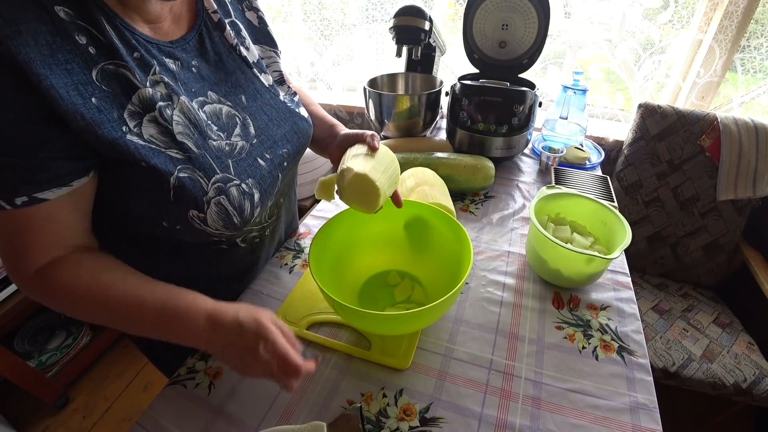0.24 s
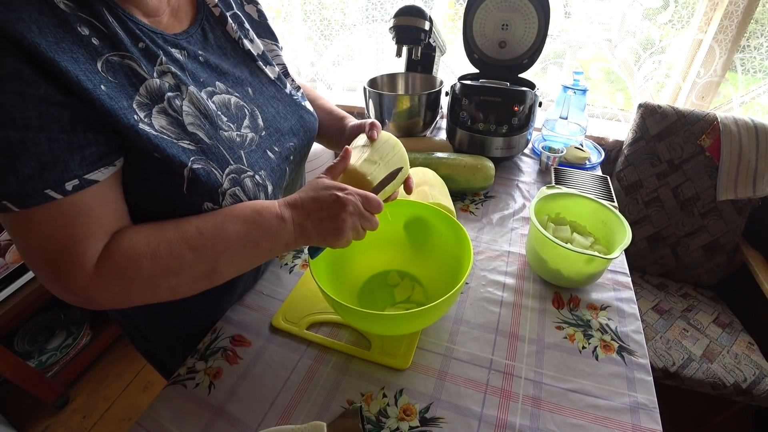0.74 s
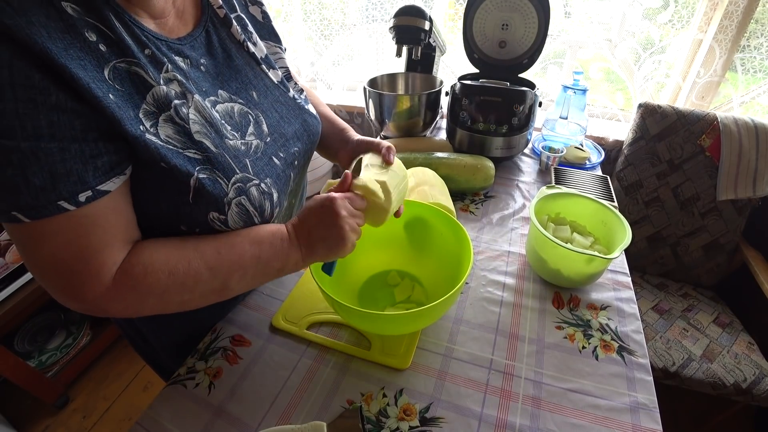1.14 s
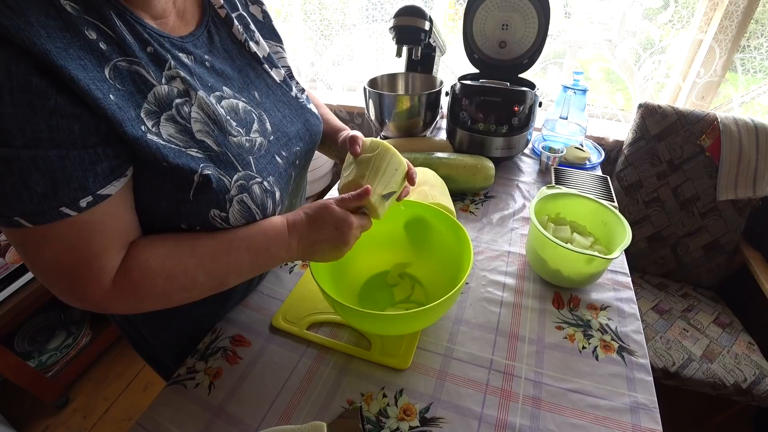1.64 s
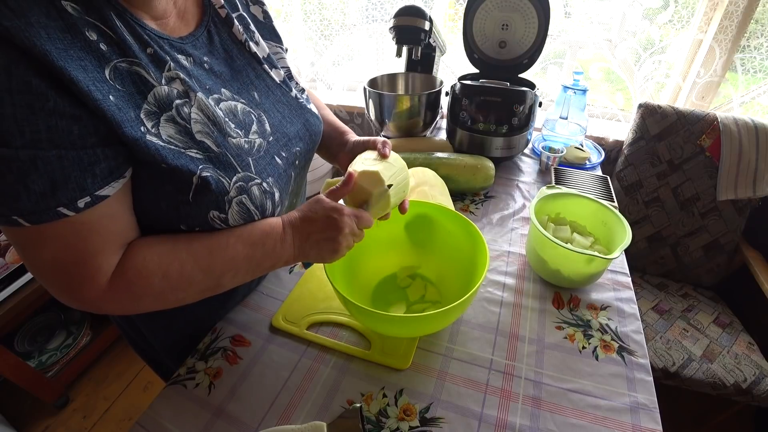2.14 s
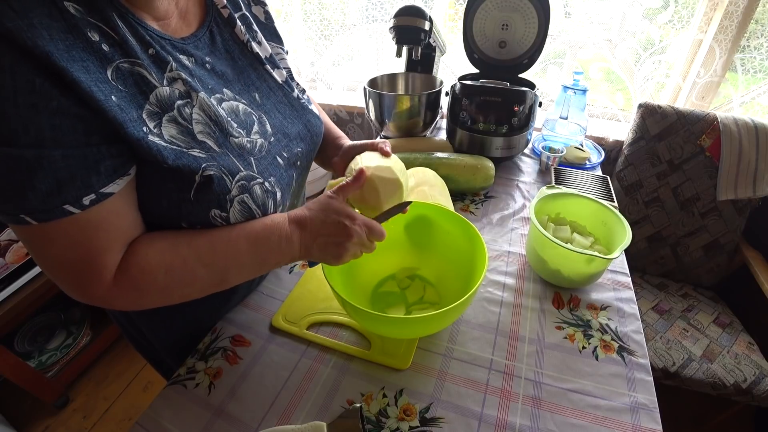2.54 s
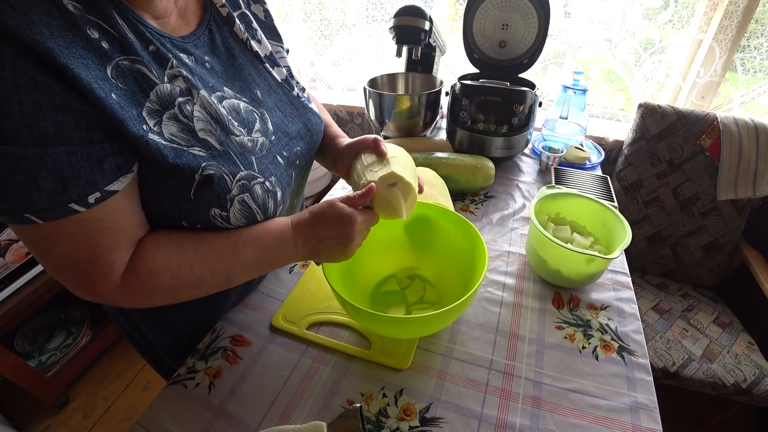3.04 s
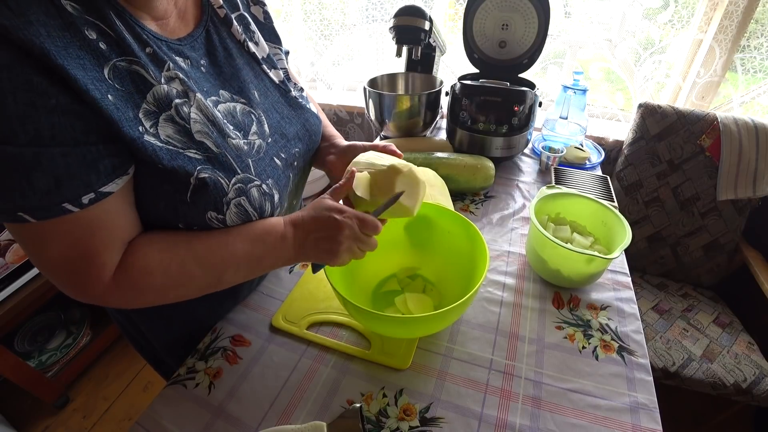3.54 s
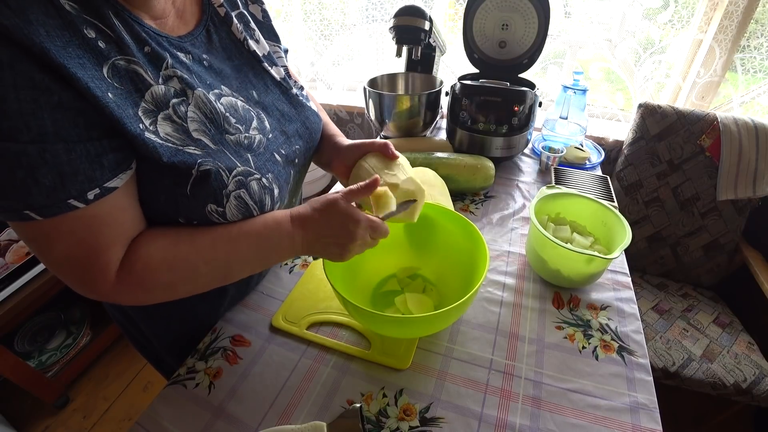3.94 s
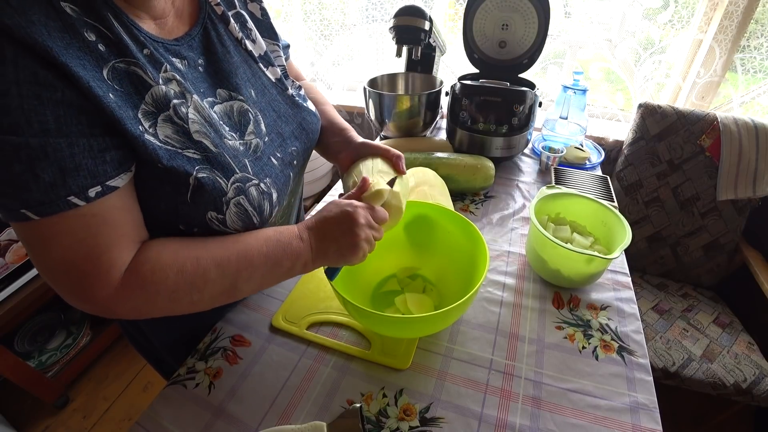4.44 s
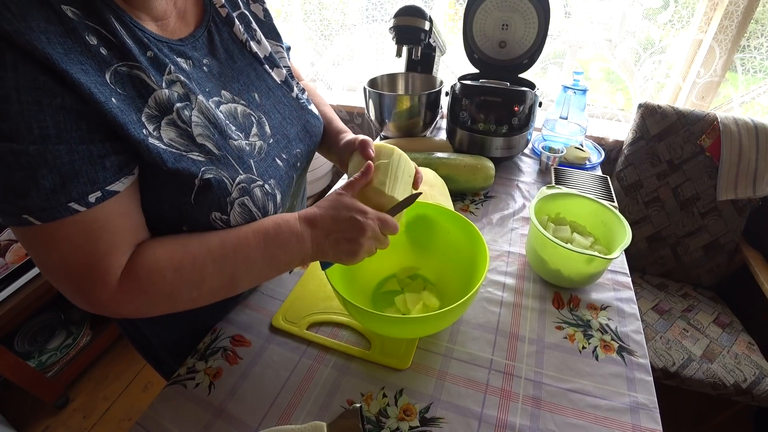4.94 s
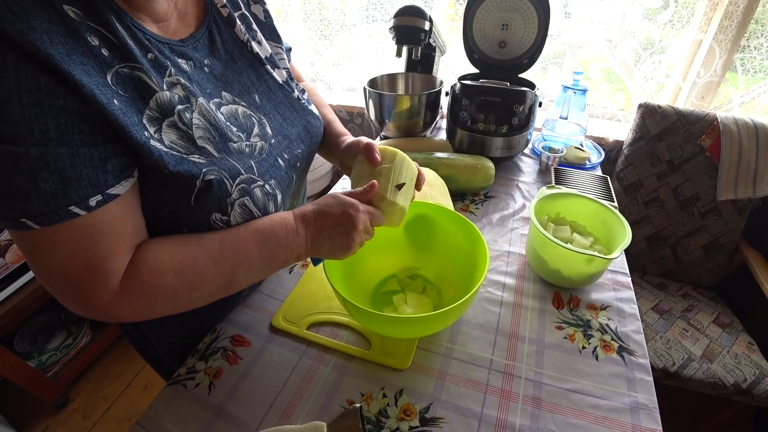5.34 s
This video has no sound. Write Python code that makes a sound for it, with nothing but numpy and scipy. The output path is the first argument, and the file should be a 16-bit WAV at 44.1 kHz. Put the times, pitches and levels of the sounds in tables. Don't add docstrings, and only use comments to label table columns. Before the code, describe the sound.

A knife crisply cuts a firm wet vegetable in the hand, chunks knocking and bouncing into a plastic bowl in a small humming kitchen.

```python
import sys
import numpy as np
from scipy import signal
from scipy.fft import rfft, irfft
from scipy.io import wavfile
from scipy.ndimage import uniform_filter1d

SR = 44100
rng = np.random.default_rng(int(sys.argv[2]) if len(sys.argv) > 2 else 0)


def ratio(d):
    e = np.asarray(d, float) / 20
    return 10 ** e


def transcribe(u):
    v = np.clip(np.atleast_2d(u).T, -1, 1)
    q = np.round(v * 32767).astype(np.int16)
    wavfile.write(sys.argv[1], SR, q)


N = 247309
TIME = np.arange(N) / SR
BOOM_HZ = 760

# (frequency [Hz], level [dB])
AIR_SPECTRUM = [(20, -16), (40, 6), (70, -19), (110, -12.5), (200, -9.5), (450, -9.5), (650, -13),
                (900, -18.5), (1600, -22), (3100, -24), (3750, -24), (4500, -25), (9000, -27), (11000, -29)]
# (frequency [Hz], level [dB])
AIR_SIDE = [(60, -18), (110, -5), (350, -6), (620, -1.5), (1120, 4.5), (2000, 3.5), (3600, -1), (6500, -5),
            (11000, -2)]
# (frequency [Hz], level [dB rms], wobble [dB])
FRIDGE_LINES = [(49, -50.5, 1), (97.6, -67, 1), (146.2, -62.5, -1), (190.9, -65.5, 4), (248, -68.5, 6.5),
                (294.5, -57.5, 1.5), (336, -74, 1.5)]
# (time [s], level [dB])
CLOTH_DRAG = [
    (0.0, -42.5),
    (0.032, -57),
    (0.116, -50.5),
    (0.162, -47),
    (0.216, -58.5),
    (0.396, -55.5),
    (0.41, -78),
    (0.572, -66),
    (0.6, -85),
]
# (middle [s], length [s], level [dB])
RUBS = [(.5, 0.21, -55.5), (.94, 0.063, -53), (1.07, 0.049, -53), (1.72, 0.23, -51.5), (2.19, .04, -46),
        (2.88, 0.098, -42), (3.07, .04, -59), (3.8, 0.45, -58), (4.2, 0.18, -62), (4.49, 0.18, -51.5),
        (4.75, 0.2, -61), (1.35, 0.22, -64), (3.3, 0.33, -64.5), (5.35, .3, -58.5), (5.13, 0.16, -53.5),
        (5.61, 0.082, -43)]
# (time [s], level [dB])
THUDS = [(0.01, -45), (.8, -53), (1.01, -56), (1.16, -53), (1.6, -52), (1.8, -37.5), (1.89, -37),
         (2.03, -35), (2.14, -45), (2.31, -36), (2.43, -40), (2.53, -43), (2.88, -40.5), (2.97, -44.5),
         (3.15, -44), (3.4, -47), (3.52, -47), (3.72, -50), (4.279, -47), (4.67, -52.5), (5.06, -47),
         (5.25, -53), (5.55, -49)]
# (time [s], peak [dB], frequency [Hz], length [s])
TICKS = [
    (0.066, -46.5, 7600, 0.00093),
    (0.093, -55, 7800, .002),
    (0.102, -54.5, 8400, 0.0066),
    (0.1384, -33.5, 9160, 0.0009),
    (0.167, -48.5, 8900, 0.0061),
]
# (time [s], peak [dB], brightest [Hz], squeak [dB])
SLIPS = [(0.851, -43, 3810, 0.5), (0.902, -40.5, 7540, -5), (0.9314, -47, 7940, 0),
         (0.955, -37.5, 7700, -8), (0.9864, -30.5, 6000, -16), (1.0181, -27.5, 6700, -24),
         (1.055, -26.5, 3880, -25), (1.091, -26.5, 7440, -19), (1.666, -32, 3690, -7.5),
         (1.6927, -26, 8350, -19), (1.767, -28, 9200, 6), (1.823, -45, 5000, -6), (2.157, -25, 6240, -8),
         (2.1867, -29, 8000, 7.5), (2.615, -43, 5500, -6), (3.7675, -42, 7900, -13),
         (3.809, -42.5, 3700, -4.5), (1.722, -41, 5450, -8), (.884, -47, 7370, 1), (4.3802, -30, 8150, -8),
         (4.436, -28, 3500, -9.5), (4.4663, -30.5, 4000, -5), (4.511, -29, 3500, -6.5),
         (4.5724, -39, 3600, -6), (4.645, -30, 5380, -22), (5.011, -40, 4130, 12.5),
         (5.057, -47, 3580, 12.5), (5.118, -39, 3780, -6), (5.203, -37, 4630, -6), (5.307, -30, 8300, -15)]
# (start [s], length [s], fine hiss at bite [dB], at end [dB], coarse tear [dB])
STROKES = [(1.095, 0.053, -41, -40, -5), (1.153, 0.051, -55, -59, -8), (1.558, 0.099, -48.5, -51, -5),
           (1.716, 0.066, -37.5, -46.5, -6), (2.215, 0.036, -28, -42.5, -11), (2.257, 0.074, -54, -58, -7),
           (2.7, 0.12, -55, -60, -10), (2.757, 0.0567, -46.5, -42.5, -7), (2.815, 0.13, -42.5, -44, -8),
           (2.933, 0.099, -46.5, -53.5, -7), (3.072, 0.043, -52, -43.5, -7), (3.112, 0.036, -51, -45.5, 5),
           (4.277, 0.077, -59, -55, -6), (4.322, 0.014, -53, -52, -7.5), (1.772, 0.056, -48, -52, 4),
           (4.558, 0.036, -50.5, -50, -6), (4.6, 0.051, -42, -47.5, -2.5), (5.071, 0.088, -48, -67, -2),
           (5.32, 0.11, -39, -56.5, -7), (5.443, 0.023, -48, -50, -10), (5.497, 0.087, -49.5, -44.5, -4)]
# (frequency [Hz], level [dB per Hz])
FLESH_SPECTRUM = [(1180, -12), (2000, -11.5), (2930, -7.5), (3840, 0), (4410, -2.5), (5780, 1.5),
                  (9930, -2), (11200, -5.5), (11500, -69), (15000, -58), (22000, -120)]
# (frequency [Hz], level [dB per Hz])
SLAP_SPECTRUM = [(2500, 3.5), (3500, 3), (5000, -0.5), (7000, -4), (9000, -13.5), (11500, -18.5)]
# (frequency [Hz], level [dB], t60 [s])
BOWL_MODES = [(425, 1, 0.11), (481.8, -3.5, 0.15), (515, -3.5, 0.13), (549, -1.5, .12), (599.7, -2, 0.14),
              (625, -3.5, 0.084), (715, -1, 0.083), (856, 1.5, 0.17), (972, -3.5, 0.13), (1111, 1.5, 0.089),
              (1145, -9, 0.14), (1272, 2.5, 0.054), (1543, -2, 0.054), (1697, -3.5, 0.085),
              (1872, -5, 0.07), (1905, -1.5, 0.067), (2020, -7, 0.051), (2076, 2.5, 0.046), (2322, 3, 0.03),
              (2425, 4, 0.02), (2590, 0, 0.027), (3000, -2, 0.033), (3300, -27, .03), (3520, -12, 0.021),
              (3700, -4, 0.034), (4440, 2, .025), (4820, 4, 0.029), (4880, -5, .025), (5350, 0, .012)]
# (frequency [Hz], level [dB], t60 [s])
BOARD_MODES = [(164, -1.5, 0.093), (200, 3, 0.14), (257.5, 0, 0.24), (299.5, 3.5, 0.083),
               (346.6, 2.5, 0.089)]
# (time [s], peak [dB], strongest ring [Hz], wall boom [dB], slap [dB])
LANDINGS = [(1.459, -11.5, 1110, -20, -2.5), (1.7377, -11, 2180, -25, -19), (2.061, -6, 1270, -22, -25),
            (2.1829, -15, 1420, -21, -17), (2.3995, -17, 2570, -26, 0.5), (2.5769, -17, 1480, -21, -34),
            (3.1175, -10, 2330, -28, -12.5), (3.3796, -17.5, 1065, -15, -14), (4.05, -39.5, 1020, -4, -31),
            (4.973, -41, 1090, -2, -7), (5.013, -22.5, 1320, -8, -24)]
# (time [s], peak [dB], strongest ring [Hz], wall boom [dB], slap [dB])
BOUNCES = [(1.578, -32.5, 1200, -15, -22), (1.635, -39.5, 711, 1.5, -3), (1.8195, -23, 1830, -18, -4),
           (1.829, -24.5, 1160, -25, -2), (1.8528, -24.5, 1110, -13, -8), (1.887, -18, 1870, -14, -15.5),
           (1.9001, -18.5, 1920, -9.5, -9.5), (1.951, -24.5, 1420, -7, -20), (2.092, -25, 1240, -8, -6),
           (2.2074, -17.5, 1870, -12, -14.5), (2.4202, -21, 1940, -4, -6.5), (2.4313, -16.5, 1150, -18, -8),
           (2.4357, -14.5, 1260, -14, -22), (2.4412, -17.5, 1200, -24, -32),
           (2.4638, -15, 1520, -14, -15.5), (2.4126, -22, 2100, -15, -12), (2.4702, -28, 1290, -6, -21),
           (2.633, -25, 1160, -8, -15.5), (3.1325, -27, 2370, -16, -43), (3.1375, -28, 1950, -8, -40),
           (3.1255, -28, 2240, -13, -42), (3.39, -21, 2380, -23, -7), (3.408, -43, 1120, 15.5, -24),
           (3.494, -36, 950, -18, -25), (4.994, -44, 2330, -17, -6), (5.074, -37, 1110, 5.5, -18)]
# (time [s], peak [dB], strongest ring [Hz], wall boom [dB], fall from that ring [dB per octave])
DRY_KNOCKS = [
    (1.4605, -14, 2130, -39, 60),
    (1.4594, -2.5, 5220, -44, 58),
    (4.974, -38.5, 2100, -32, 40),
    (.067, -43, 890, 3, 21),
    (0.162, -35, 850, -15, 24),
    (0.14, -43, 900, -17, 24),
    (1.4795, -33, 420, 4.5, 12),
]
# (time [s], peak [dB], strongest swing [Hz])
SWINGS = [(1.459, -26, 640), (1.4592, -23, 425), (1.739, -23.5, 540), (2.062, -21.5, 438),
          (2.207, -25, 515), (2.4, -30.5, 434), (2.435, -28, 484), (2.577, -27, 487), (3.118, -28.5, 545),
          (3.392, -26.5, 542), (5.014, -30.5, 518)]
# (time [s], peak [dB])
ROCKS = [(0.082, -40), (0.108, -41), (0.161, -52), (1.458, -31), (1.601, -36), (1.693, -51), (1.738, -26),
         (1.819, -29), (1.886, -26.5), (1.948, -28), (2.062, -20.5), (2.204, -31), (2.404, -26),
         (2.436, -32.5), (2.461, -52), (2.575, -33.5), (3.12, -32), (3.199, -41), (3.3758, -21.5),
         (3.409, -33), (5.014, -29)]
# (frequency [Hz], t60 [s])
ROOM_T60 = [(125, 0.51), (500, 0.42), (1500, 0.35), (4000, 0.24), (10000, 0.08)]
# (frequency [Hz], level [dB])
ROOM_SIDE = [(60, 5), (200, -10.5), (350, -17.5), (1000, -8), (4000, -7.5), (11000, -6)]


def unit(x):
    return x / np.sqrt(np.mean(x ** 2))


def along(points, hz):
    f, v = np.transpose(points)
    return np.interp(np.log(np.maximum(hz, 1)), np.log(f), v)


def colour(x, points):
    gain = ratio(along(points, np.fft.rfftfreq(len(x), 1 / SR)))
    return irfft(rfft(x) * gain, len(x))


def band(x, lo_hz, hi_hz):
    sos = signal.butter(2, [lo_hz, min(hi_hz, .45 * SR)], "bandpass", fs=SR, output="sos")
    return signal.sosfilt(sos, x)


def walk(rate_hz):
    k = int(SR / rate_hz)
    held = np.repeat(rng.standard_normal(N // k + 1), k)
    return 1.3 * uniform_filter1d(uniform_filter1d(held, k), k)[:N]


def crackle(size, spread_db):
    clicks = rng.standard_normal(size)
    burst = np.minimum(rng.exponential(size=size), 5.0)
    return unit(clicks * ratio(spread_db * burst))


def pair(mid, side, side_db):
    return mid + ratio(side_db) * side * np.array([[1], [-1]])


def lean(db):
    return ratio(np.array([[-db], [db]]))


def add(out, s, x):
    i = int(s * SR)
    out[..., i:i + x.shape[-1]] += x[..., :N - i]


def swells(events, rest_db, rise_db_per_s, fade_db_per_s):
    s, length, db = np.transpose(events)[:, :, None]
    early = np.maximum(s - length / 2 - TIME, 0)
    late = np.maximum(TIME - s - length / 2, 0)
    level_db = db - rise_db_per_s * early - fade_db_per_s * late
    return np.maximum(level_db.max(axis=0), rest_db)


def ring(modes, weight_db, luck, t):
    hz, mode_db, t60_s = np.transpose(modes)
    gain = np.sign(luck[0]) * ratio(mode_db + weight_db + 2.0 * np.abs(luck[0]))
    tone = np.sin(2 * np.pi * np.outer(hz * (1 + 0.0028 * luck[1]), t))
    return gain @ (tone * ratio(-60 * t / t60_s[:, None]))


def air():
    total, swell = 0, walk(0.46)
    for hz in 25 * 2 ** np.arange(0, 9, .5):
        mid, side = (colour(band(rng.standard_normal(N), hz / 1.242, hz * 1.25), AIR_SPECTRUM) for _ in range(2))
        total = total + ratio(0.6 * swell + 0.36 * walk(17.0)) * pair(mid, side, along(AIR_SIDE, hz))
    return unit(total) * ratio(-52)


def fridge():
    hum = 0
    for hz, db, wobble_db in FRIDGE_LINES:
        level = np.sqrt(2) * ratio(db + wobble_db * walk(9.))
        hum = hum + level * np.sin(2 * np.pi * np.cumsum(hz * (1 + 0.0024 * walk(2.71))) / SR)
    whine = ratio(-70.5 + 1.0 * walk(4.8)) * unit(band(rng.standard_normal(N), 3600, 3830))
    return whine + hum * lean(.25)


def cloth_drag():
    level_db = np.interp(TIME, *np.transpose(CLOTH_DRAG), right=-90)
    return unit(band(crackle(N, spread_db=3.5), 140, 730)) * ratio(level_db + 3.1 * walk(40.0))


def finger_rubs():
    level_db = swells(RUBS, rest_db=-69, rise_db_per_s=160, fade_db_per_s=160)
    rustle = unit(colour(crackle(N, spread_db=3.0), FLESH_SPECTRUM))
    return rustle * ratio(level_db - 5.5 + 5.1 * walk(25.09))


def table_thuds():
    events = [(s, 0, db) for s, db in THUDS]
    level_db = swells(events, rest_db=-60, rise_db_per_s=160, fade_db_per_s=112)
    return unit(band(band(rng.standard_normal(N), 12.0, 98), 29, 250)) * ratio(level_db - 3.0)


def blade_ticks(out):
    t = TIME[:SR // 12]
    for s, db, hz, length_s in TICKS:
        noise = band(band(rng.standard_normal(len(t)), hz / 1.34, hz * 1.3), hz / 1.3, hz * 1.26)
        u = t / length_s
        tick = 1.13 * unit(noise) + np.sin(2 * np.pi * hz * t)
        add(out, s - length_s, ratio(db) * (u * np.exp(1 - u)) ** 2 * tick)


def blade_slips(out, tear, squeak):
    crest_s, lead_s = 0.0075, .004
    t = TIME[:SR // 12]
    u = t / crest_s
    for s, db, bright_hz, squeak_db in SLIPS:
        i = int(s * SR) % (N - len(t))
        cut = tear[i:i + len(t)]
        bright = unit(band(cut, bright_hz / 1.09, bright_hz * 1.02))
        jerk = 0.96 * cut + 0.33 * bright + ratio(squeak_db - 1.0) * squeak[i:i + len(t)]
        add(out, s - lead_s, ratio(db - 8.5) * (u * np.exp(1 - u)) ** 4 * jerk)


def blade_strokes(tear, squeak):
    firm_db, bite_s = -42, 0.0031
    judder = ratio(1.8 * walk(150.) + 1.5 * walk(35.))
    coarse = unit(band(tear, 2620, 4600))
    fine = unit(band(band(tear, 4650, 12000), 4100, 11300))
    out = np.zeros(N)
    for s, length_s, bite_db, end_db, coarse_db in STROKES:
        db = np.interp(TIME, [s, s + length_s], [bite_db, end_db])
        squeak_db = -9.5 + 0.36 * (firm_db - db)
        edge = np.clip(np.minimum(TIME - s, s + length_s + 0.0043 - TIME) / bite_s, 0, 1)
        out += edge * judder * ratio(db) * (fine + ratio(coarse_db) * coarse + ratio(squeak_db) * squeak)
    return out


def blade():
    tear = unit(colour(crackle(N, spread_db=2.5), FLESH_SPECTRUM))
    squeak = unit(band(band(crackle(N, spread_db=1.5), 650, 2100), 700, 4000))
    out = np.zeros(N)
    blade_ticks(out)
    blade_slips(out, tear, squeak)
    return out + blade_strokes(tear, squeak)


def knocks():
    first = [(*r, max(59.5 + 1.7 * r[-1], 18.5)) for r in LANDINGS]
    again = [(*r, 17) for r in BOUNCES]
    dry_slap_db = -51
    return sorted(first + again) + [(*r[:-1], dry_slap_db, r[-1]) for r in DRY_KNOCKS]


def wall_knocks(out, hits, spots, slaps):
    t, modes = TIME[:SR // 4], np.array(BOWL_MODES)
    hz = modes[:, 0]
    low, high = hz < BOOM_HZ, hz >= BOOM_HZ
    press = 1 - np.exp(-(t * 3000) ** 2)
    cling = ratio(-6) + (1 - ratio(-6)) * np.exp(-t / 0.003)
    for (s, db, ring_hz, boom_db, slap_db, focus_db), luck in zip(hits, spots):
        alike = np.array([np.abs(luck[0]), luck[1]])
        weight_db = np.where(low, boom_db, -focus_db * np.abs(1.3 * np.log2(hz / ring_hz)) ** 1.5)
        boom = ring(modes[low], weight_db[low], luck[:, low], t)
        rim = ring(modes[high], weight_db[high], alike[:, high], t) * cling
        wall = press * (ratio(-8.0) * rim + ratio(-10.0) * boom * (1 - np.exp(-t / 0.0018)))
        touch_db = np.where(low, boom_db, weight_db / 2)
        touch = ring(modes, touch_db, luck[::-1], t) * np.exp(-t * 450)
        wall = wall + ratio(-18) * touch
        i = int(s * SR) % (N - len(t))
        slap = ratio(slap_db + 1.5) * slaps[i:i + len(t)]
        knock = wall + slap * (np.exp(-t / 0.0032) + 0.21 * np.exp(-t / 0.0082))
        broad = wall * np.exp(-t * 110) + ratio(-9) * slap * np.exp(-t * 70) + ratio(-16.5) * touch
        add(out, s, ratio(db) * np.array([knock, broad]) * (1 - np.exp(-t / 0.0001)))


def wall_swings(out, spots):
    t, modes = TIME[:SR // 4], np.array(BOWL_MODES)
    low = modes[:, 0] < BOOM_HZ
    rise_s, focus_db_per_octave = 0.0061, 22
    for (s, db, swing_hz), luck in zip(SWINGS, spots):
        weight_db = -focus_db_per_octave * np.abs(np.log2(modes[low, 0] / swing_hz))
        swing = ring(modes[low], weight_db, luck[:, low], t)
        add(out, s, ratio(db) * swing * (1 - np.exp(-(t / rise_s) ** 2)))


def board_rocks(out):
    t = TIME[:SR // 4]
    for s, db in ROCKS:
        rock = ring(BOARD_MODES, 0, rng.standard_normal((2, len(BOARD_MODES))), t)
        add(out, s, ratio(db - 10.5) * rock * (1 - np.exp(-t / 0.0021)))


def bowl():
    out, hits = np.zeros((2, N)), knocks()
    slaps = unit(colour(crackle(N, spread_db=-4.5), SLAP_SPECTRUM))
    spots = rng.standard_normal((len(hits), 2, len(BOWL_MODES)))
    wall_knocks(out, hits, spots, slaps)
    wall_swings(out, spots[::-1])
    board_rocks(out)
    return band(out, 232, 12000)


def room(x):
    t, tail = TIME[:SR // 2], 0
    for hz in 90 * 2 ** np.arange(0, 7.6, .5):
        mid, side = (band(crackle(len(t), spread_db=2.5), hz / 1.136, hz * 1.275) for _ in range(2))
        tail = tail + pair(mid, side, along(ROOM_SIDE, hz)) * ratio(-60 * t / along(ROOM_T60, hz))
    tail = tail * np.clip((t - .002) / 0.0052, 0, 1)
    tail = tail / np.sqrt(np.sum(tail[0] ** 2))
    return signal.fftconvolve(x[None], tail, axes=1)[:, :N]


def scene():
    rustle = finger_rubs() + cloth_drag()
    thud = table_thuds()
    hits, broad = bowl()
    near = blade() + rustle
    direct = hits + near
    wet = room(ratio(-5.5) * broad + ratio(-10.0) * near)
    glance = ratio(-13.5) * band(np.roll(direct, SR // 900), 2900, 21000) * np.array([[1], [-1]])
    return (direct + wet) * lean(0.44) + glance + thud * lean(.8) + air() + fridge()


def low_pass(x):
    return signal.sosfilt(signal.butter(12, 12200, fs=SR, output="sos"), x)


def record(dry):
    rounded = np.tanh(0.71 * dry) / 0.89
    top = signal.ellip(10, .2, 62, 11180, fs=SR, output="sos")
    return low_pass(signal.sosfilt(top, rounded))


dry = scene()
out = record(dry)
transcribe(out)
```